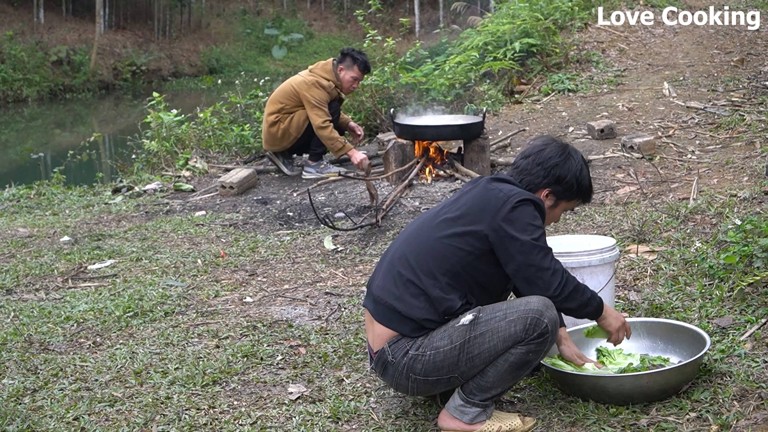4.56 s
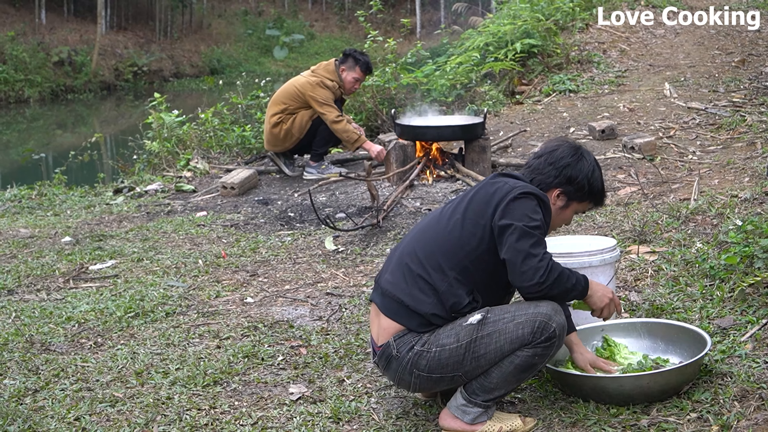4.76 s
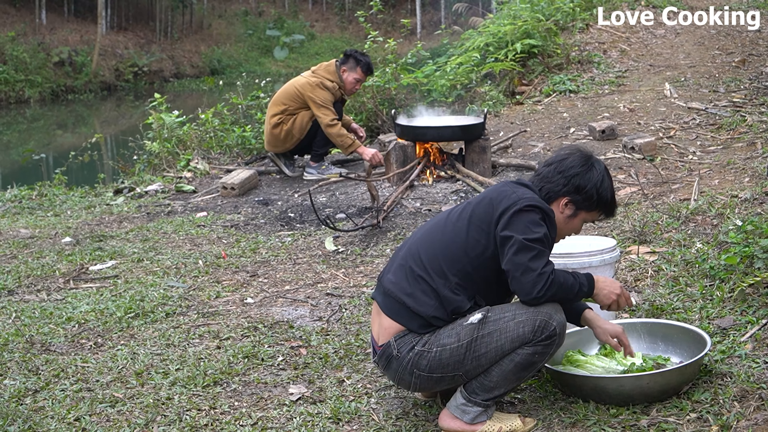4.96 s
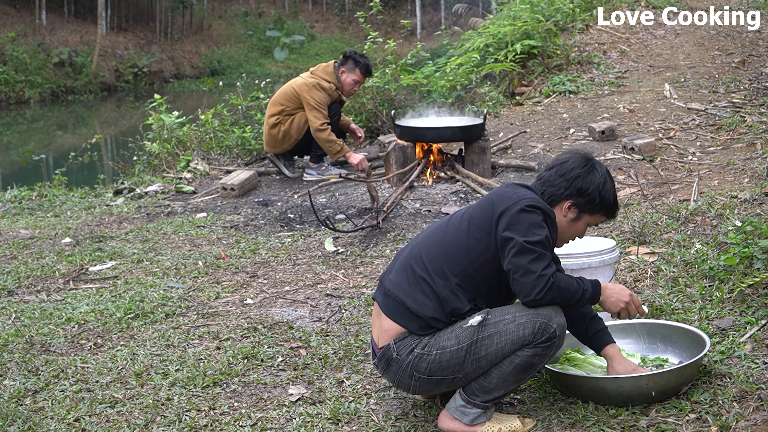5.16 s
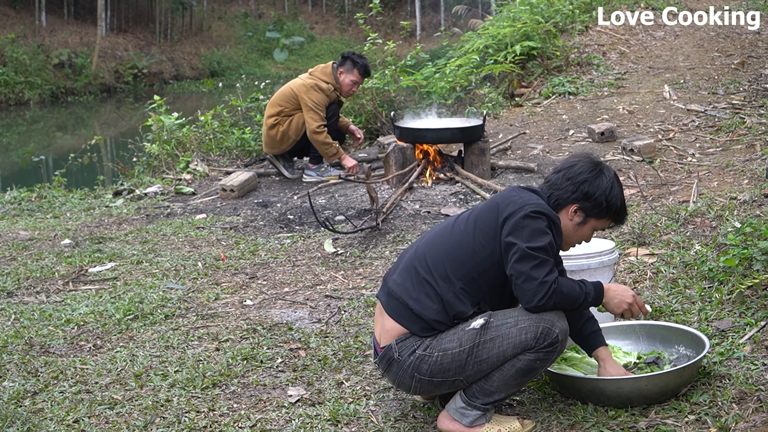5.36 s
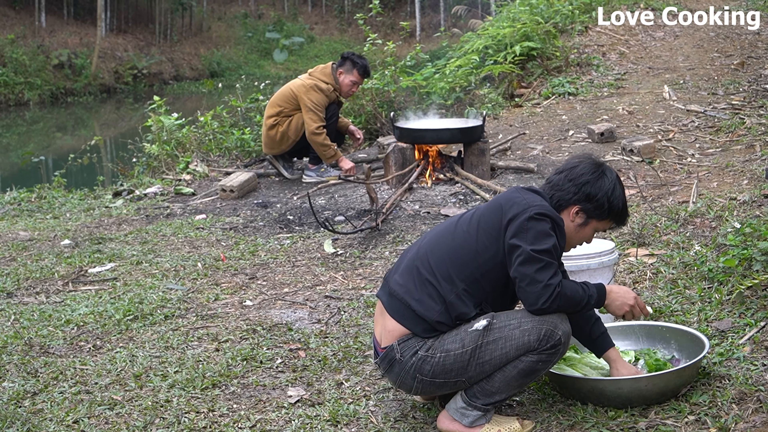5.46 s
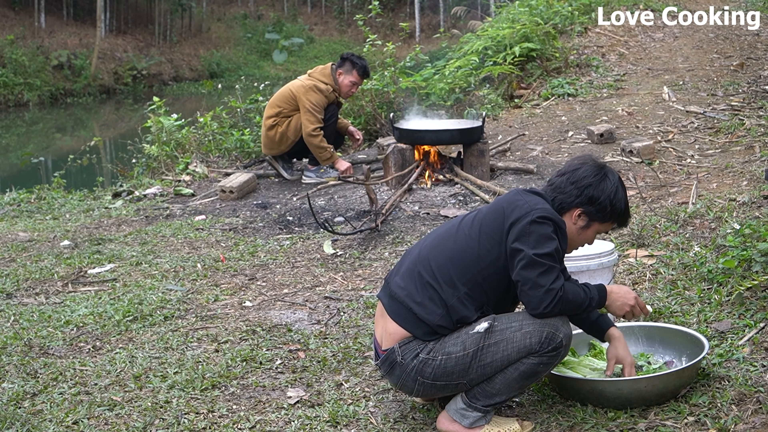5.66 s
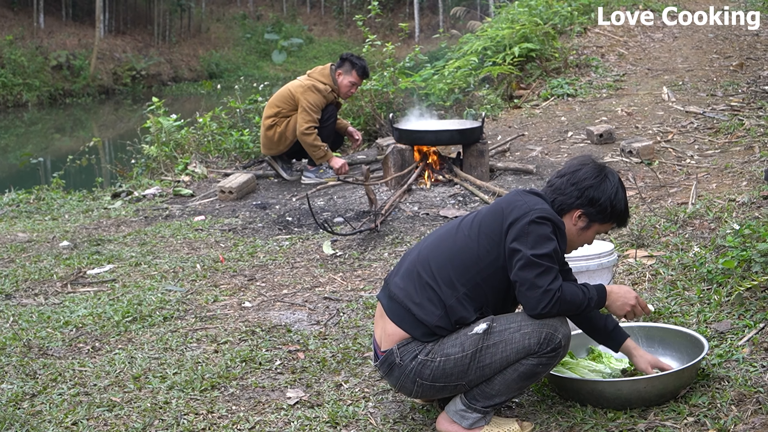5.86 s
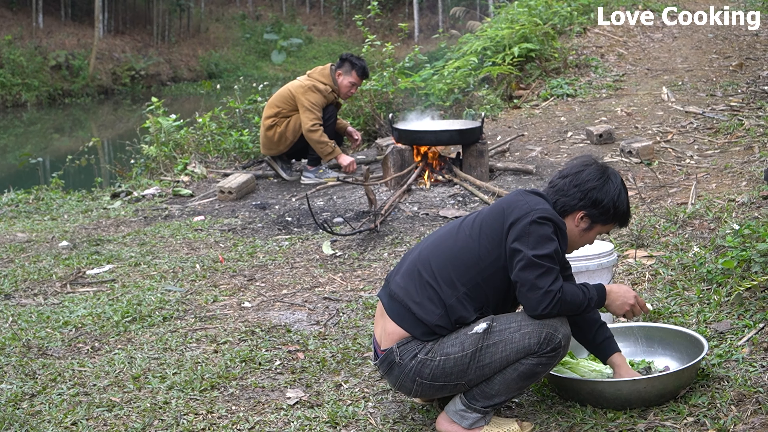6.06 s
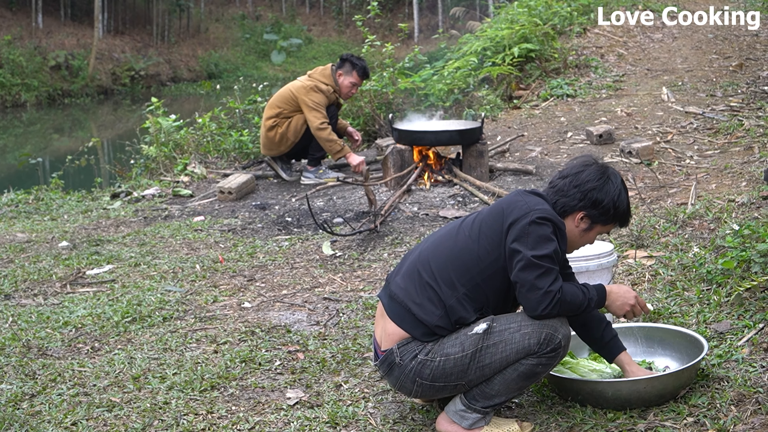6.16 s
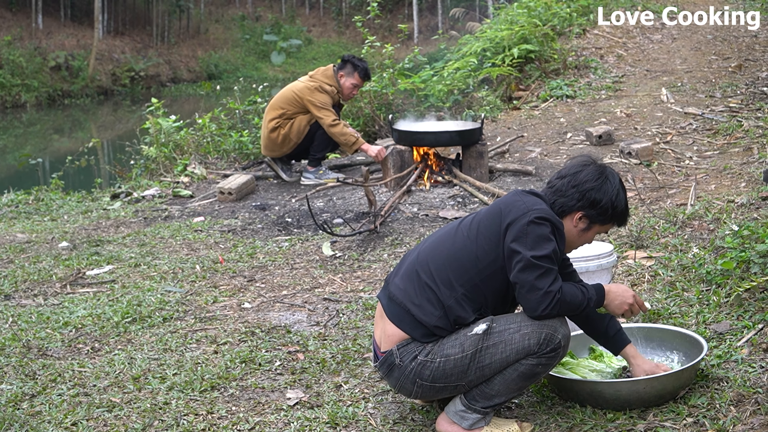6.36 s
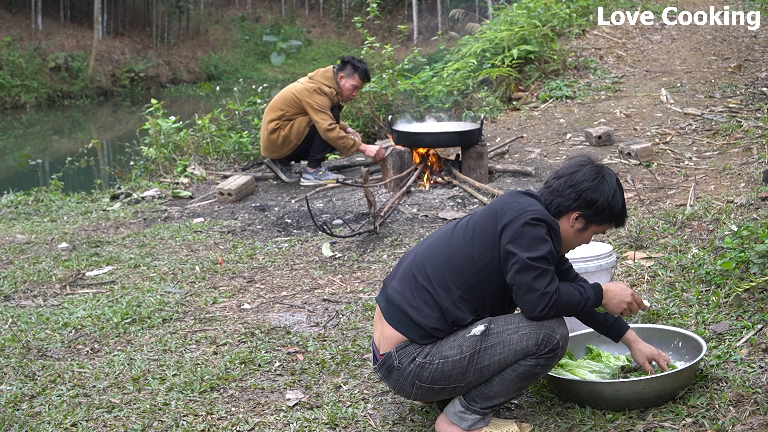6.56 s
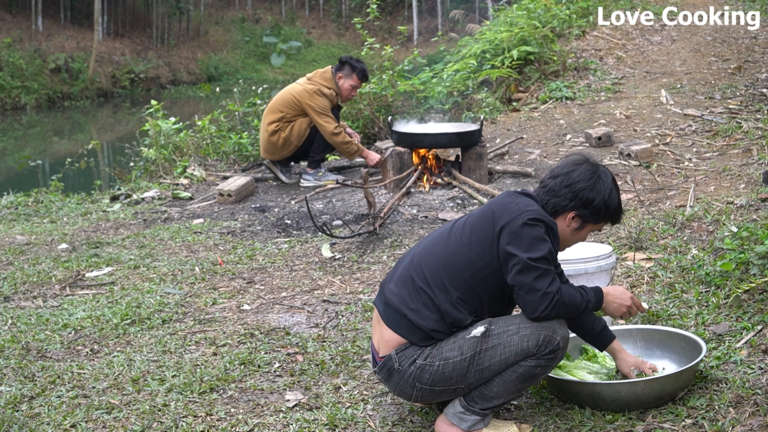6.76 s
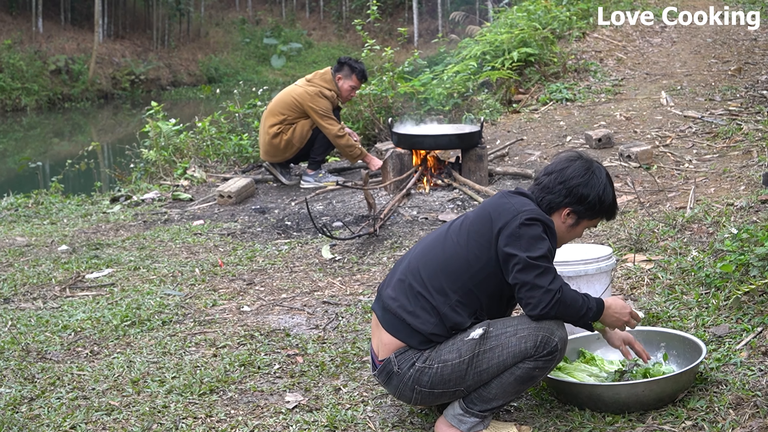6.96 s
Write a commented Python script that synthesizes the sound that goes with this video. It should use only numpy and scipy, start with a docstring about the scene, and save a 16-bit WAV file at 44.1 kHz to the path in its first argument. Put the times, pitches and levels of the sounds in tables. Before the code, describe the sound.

Outdoors, very close to a wide steel basin, a hand sloshes wet leafy greens while a crisp stalk cracks in sharp clusters and rubs squeakily. After about a second and a half it calms to small leaf clicks and drips, with a faint bird whistling far away. Then the washing is heard from a little farther off, with light swishes and falling drops over quiet air.

```python
"""Outdoors, close to a wide steel basin, a hand washes greens: bubbles make the slosh and spray, noise ticks
the leaves. In the first seconds a crisp stalk breaks in snaps, volleys of tiny impacts, and wet skin rubs in
stick-slip pulses. Then a small bird whistles now and then in the distance, in falling, trilled sine tones.
Later the washing sounds more distant, and scooped water falls back in short patters. Throughout, filtered noise
gives quiet air and a low rumble."""
import sys
import numpy as np
from scipy import signal
from scipy.fft import rfft, irfft, next_fast_len
from scipy.io import wavfile
from scipy.ndimage import uniform_filter1d, map_coordinates

SR = 44100
rng = np.random.default_rng(int(sys.argv[2]) if len(sys.argv) > 2 else 0)


def master_out(mix):
    """Clip the mix to full scale and print it as 16-bit PCM to the path in sys.argv[1]."""
    frames = np.transpose(np.atleast_2d(mix))
    ceiling = np.clip(frames, -1, 1)
    pcm = np.round(ceiling * 32767).astype(np.int16)
    wavfile.write(sys.argv[1], SR, pcm)


N = 308700
TIME = np.arange(N) / SR

# colours of big bubbles, small bubbles and leaves: (frequency [Hz], filter gain [dB])
SLOSH_COLOUR = [(90, -51), (200, -14.5), (330, -10), (480, -13.5), (650, -8.5), (830, -0.5), (1100, 0),
                (1400, -8.5), (2200, -43)]
SPRAY_COLOUR = [(700, -25), (1050, -3.5), (1300, -7), (1850, 1.5), (2400, 1), (3200, 2.5), (4200, -3),
                (5700, -4), (6700, -12), (8500, -13.5), (14000, -51.5)]
LEAF_COLOUR = [(3500, -35), (5500, 2.5), (6800, 0.5), (8500, -4), (11000, -8), (15500, -15)]
DISTANT_S = 4.4  # from here on the basin sounds more distant


def washing():
    """Stirred water traps big bubbles, its spray bursts into small ones, and wet leaves tick against each other."""
    slosh_gain, spray_gain, leaf_gain = stirring()
    # closeness falls from 1 to 0 in the half second before the basin turns distant
    near = np.clip(2 * (DISTANT_S - TIME), 0, 1)

    # the same contacts sound in every layer; harder stirring blurs them into a rush
    contact = ticks(rate=320, spread_db=5.0, decay=0.0024)
    slosh_db = 20 * np.log10(slosh_gain + 1e-9)
    churn = amp(np.clip(0.25 * (slosh_db + 55), -14, 4)) * rng.standard_normal(N)
    stirred = contact + churn

    big = bubbles(rate=300, lo_hz=373.3, hi_hz=1484, cycles=4.5, rise=0.076, spread_db=5.0, size=2400)
    small = bubbles(rate=700, lo_hz=1153.6, hi_hz=6274, cycles=8, rise=0.0525, spread_db=3.0, size=1100)
    # at first a mat of leaves covers the water and the bubbles are weaker in the mix
    free_water = amp(2 - 6 * near)
    slosh = free_water * coloured(big, SLOSH_COLOUR) + amp(-0.5) * coloured(stirred, SLOSH_COLOUR)
    spray = free_water * coloured(small, SPRAY_COLOUR) + amp(-1.0) * coloured(stirred, SPRAY_COLOUR)
    slosh, spray = [evened(unit(x + near * (hollow(x) - x)), span=0.051) for x in (slosh, spray)]

    leaf_ticks = contact + amp(-5) * ticks(rate=70, spread_db=2, decay=0.00084)
    crackle = evened(coloured(leaf_ticks, LEAF_COLOUR), span=0.06)
    return amp(-1.5) * slosh_gain * slosh + spray_gain * spray + leaf_gain * crackle


# strokes of the hand through the water, levels before the mix: (time at full speed [s], length [s],
# spray level [dB], slosh level over the spray [dB], leaf crackle level over the spray [dB])
STROKES = [(0.045, 0.14, -54, -2.5, -18), (0.117, 0.2, -58, 2.5, -10), (0.385, .14, -52, 1.5, -9),
           (0.56, 0.15, -57.5, -1, -11.5), (0.713, .04, -55.5, 2.5, -11), (0.766, 0.041, -49.5, -4, -7),
           (0.905, 0.21, -51.5, 0, -2.5), (1.156, 0.11, -63, 6.5, -6), (1.268, 0.044, -52.5, -1, -4.5),
           (1.346, .12, -60.5, 3, -23), (1.47, 0.086, -68, -2, -4), (1.759, 0.018, -64.5, -8, -12),
           (1.884, 0.22, -71, -8, 0), (2.122, 0.22, -60, -7.5, -7.5), (2.486, 0.42, -70, -6.5, -9),
           (2.772, 0.028, -66.5, 0, -5), (2.872, 0.01, -65, -7, 0), (2.998, 0.048, -65.5, -6, -11),
           (3.466, 0.099, -64.5, -5.5, -6), (3.768, 0.034, -49, -9, -5), (3.974, .02, -62.5, -3, -3.5),
           (4.436, 0.17, -58, -5, -12), (4.68, 0.077, -56.5, -5.5, -17.5), (4.808, 0.19, -64, -5, -13),
           (5.198, 0.083, -59.5, -8, -12.5), (5.344, 0.35, -61, -5.5, -14), (5.765, 0.059, -66, -11, -9),
           (6.016, 0.14, -54, -4.5, -19), (6.192, 0.078, -56.5, -2.5, -19), (6.3, .18, -52, -2.5, -17.5),
           (6.57, 0.019, -52, -0.5, -18), (6.66, 0.091, -56.5, -2, -10), (6.8, 0.053, -54, -1.5, -14.5),
           (6.917, 0.056, -57, -19, -11)]
LAPPING_DB = -74  # spray level at which the water still drips and laps between strokes, before the flicker
SETTLE_DB_PER_S, LEAF_SETTLE_DB_PER_S = 236, 334


def stirring():
    """Gains of slosh, spray and leaf crackle; the strongest stroke of the moment rules each."""
    slosh, spray, crackle = np.zeros(N), np.full(N, amp(LAPPING_DB)), np.zeros(N)
    for start, length, db, slosh_db, leaf_db in STROKES:
        water = amp(db) * stroke(start, length, SETTLE_DB_PER_S)
        leaves = amp(db + leaf_db) * stroke(start, length, LEAF_SETTLE_DB_PER_S)
        spray = np.maximum(spray, water)
        slosh = np.maximum(slosh, amp(slosh_db) * water)
        crackle = np.maximum(crackle, leaves)
    flicker = amp(0.77 * wobble(28))
    return np.array([slosh, spray, crackle]) * flicker


# a stroke of the usual length gathers speed at this pace, a shorter one more abruptly (by the power JERK)
RISE_DB_PER_S, USUAL_STROKE_S, JERK = 380, 0.083, 0.6
SAG_DB = 0.5  # the middle of a stroke is this much softer than its ends


def stroke(start, length, settle_db_per_s):
    """One push of the hand: it gathers speed, holds nearly level for its length and dies away."""
    age, length = TIME - start, max(length, .01)
    rise_db = RISE_DB_PER_S * (USUAL_STROKE_S / length) ** JERK * np.clip(age, -1, 0)
    sag_db = SAG_DB * (np.sin(np.pi * np.clip(age / length, 0, 1)) - .5)
    settle_db = settle_db_per_s * np.clip(age - length, 0, 1)
    return amp(rise_db - sag_db - settle_db)


# the basin's hollow from close by: (resonance frequency [Hz], width [Hz], level added to the direct sound [dB])
BASIN = [(890, 190, -6), (1480, 200, -8.5), (1800, 270, -4), (3550, 460, -16), (5900, 5400, -7.5)]


def hollow(x):
    """Close to the basin its few broad resonances stand out."""
    return x + sum(amp(db) * ring(x, hz, hz / width) for hz, width, db in BASIN)


def bubbles(rate, lo_hz, hi_hz, cycles, rise, spread_db, size):
    """A cloud of bubbles: damped sines whose pitch climbs as they near the surface."""
    when, pitch, life, strength = rng.random((int(rate * N / SR), 4)).T[:, :, None]
    hz = lo_hz * (hi_hz / lo_hz) ** pitch
    t = np.arange(size) / SR
    age = t * hz / (cycles * (.5 + life))
    phase = 2 * np.pi * hz * t * (1 + rise * np.minimum(age, 4) / 2)
    gain = amp(-spread_db * np.log(0.025 + strength))
    waves = gain * np.sin(phase) * np.exp(-age) * (1 - np.exp(-t * hz))
    places = (when * N).astype(int) + np.arange(size)
    return np.bincount(places.ravel(), waves.ravel(), N)[:N]


def ticks(rate, spread_db, decay):
    """Tiny cracks at random times, each a puff of noise that decays exponentially."""
    when, strength = rng.random((int(rate * N / SR), 2)).T
    tick_power = amp(-abs(spread_db) * np.log(0.005 + strength)) ** 2
    power = np.bincount((when * N).astype(int), tick_power, N)
    envelope = np.sqrt(signal.lfilter([1], [1, -np.exp(-2 / (decay * SR))], power))
    return unit(envelope * rng.standard_normal(N))


# stalks breaking, a thick one dull, a thin one crisp, levels before the mix:
# (time [s], decay scale [s], level [dB], tilt to the bass [dB], ring frequency [Hz])
SNAPS = [(0.095, 0.0085, -51, -0.5, 3160), (0.402, 0.0032, -52, 5.5, 1100), (0.464, 0.0024, -43.5, 5, 860),
         (0.477, 0.0022, -47.5, 4.5, 950), (0.745, 0.002, -40.5, 1.5, 3500),
         (0.7783, 0.0028, -36.5, 1, 5870), (0.784, 0.005, -48, 14, 900), (0.8046, 0.0015, -45, -3, 3180),
         (0.811, 0.0013, -40, -9, 5940), (0.9262, 0.0028, -39, 1, 2470), (0.98, 0.0026, -28, 2.5, 1720),
         (0.988, 0.0023, -40.5, -2, 790), (1.005, 0.0032, -43.5, 2, 5630), (1.068, 0.0033, -37, 0, 1860),
         (1.072, 0.0028, -36.5, 0.5, 1830), (1.091, 0.0012, -40, 4, 1650), (1.093, .0016, -41, -9.5, 5200),
         (1.2428, .0034, -47.5, 0, 960), (1.276, 0.0053, -47.5, 9.5, 980),
         (1.76, 0.0039, -53.5, -1.5, 2430), (2.142, 0.0038, -58, -2.5, 1530), (2.219, .003, -63, -4, 3420),
         (2.734, .003, -51.5, -4, 810), (2.763, .0028, -55.5, 0, 4750), (3.7338, .0028, -53.5, -3, 3800),
         (3.806, 0.0031, -53, 8, 810), (3.82, .0044, -46.5, -4.5, 2120)]


def snaps():
    """Fibres of a stalk give way in clusters."""
    track = np.zeros(N)
    for s, length, db, tilt_db, hz in SNAPS:
        snap = fracture(length, db, tilt_db, hz, spiky_db=2.0, ring_db=14.0, q=5.1,
                        break_db=6.5, low_hz=171, top_hz=14700)
        add(track, s, snap)
    return track


# thin leaf ribs clicking, levels before the mix: (time [s], level [dB])
CLICKS = [(0.0798, -53), (0.587, -66), (0.974, -58), (1.1245, -62), (1.801, -73), (1.96, -66.5),
          (1.966, -69.5), (2.085, -64), (2.231, -63.5), (2.383, -68), (2.416, -70), (2.495, -69),
          (2.534, -71.5), (2.784, -67.5), (2.877, -72), (3.085, -69.5), (3.223, -73), (3.334, -79),
          (3.529, -65.5), (3.6009, -51.5), (5.947, -75), (6.339, -60.5)]
CLICK_S, CLICK_TILT_DB, CLICK_HZ = 0.00175, -11, 6340  # shared by all clicks: decay scale, bass tilt and ring


def clicks():
    """A thin leaf rib gives way all at once, with one short, bright click."""
    track = np.zeros(N)
    for s, db in CLICKS:
        click = fracture(CLICK_S, db, CLICK_TILT_DB, CLICK_HZ, spiky_db=0.0, ring_db=5, q=4,
                         break_db=14.5, low_hz=302, top_hz=16500)
        add(track, s, click)
    return track


# colours of the low, middle and high parts of a crack: (frequency [Hz], filter gain [dB])
BODY_COLOUR = [(110, -31.5), (260, -13), (450, -3.5), (830, -1.5), (1100, -6.5), (1600, -29.5)]
CRACK_COLOUR = [(800, -34.5), (1300, 0), (1850, 4.5), (2050, 1.5), (2600, 1), (3400, 1), (4800, -37.5)]
CRISP_COLOUR = [(2900, -19), (4200, -2.5), (5700, 0), (7500, -8), (11000, -12.5), (15500, -16)]
BODY_DB, CRISP_DB = -6, -4  # an untilted crack's low and high parts, against its middle


def fracture(length, db, tilt_db, hz, spiky_db, ring_db, q, break_db, low_hz, top_hz):
    """A volley of tiny impacts with one sharp break early in it; treble dies first and a pocket of air rings along."""
    t = np.arange(SR // 16) / SR
    age = t / max(length, 1 / SR)
    spikes_db = spiky_db * np.repeat(rng.standard_normal(len(t)), 8)[:len(t)]
    volley = rng.standard_normal(len(t)) * amp(spikes_db)
    ringing = amp(ring_db) / (1 + (hz / 3500) ** 2)  # tiny pockets hardly ring
    sound = np.zeros(len(t))
    # each part: level [dB], colour, upper edge [Hz], speed of its decay
    parts = [(BODY_DB + tilt_db, BODY_COLOUR, 2500, 1),
             (0, CRACK_COLOUR, 6000, 1.05),
             (CRISP_DB - tilt_db, CRISP_COLOUR, top_hz, 1.25)]
    for part_db, colour, edge_hz, speed in parts:
        push = volley * np.sqrt(age) * np.exp(-age * speed)
        push[np.searchsorted(age, .4)] += amp(break_db)
        push = push + ringing * ring(push, hz, q)
        sound += amp(db + part_db) * burst(band(tinted(push, colour), low_hz, edge_hz))
    return sound


# wet stalks rubbing under the fingers: (time [s], length [s], first slip rate [Hz], last slip rate [Hz],
# level [dB], low-pass corner [Hz])
RUBS = [(1.1612, 0.0093, 700, 634, -35, 1960), (1.353, 0.026, 721, 615, -42, 493),
        (1.44, 0.013, 979, 830, -43.5, 1190)]


def rubs():
    """Wet skin sticks and slips on a stalk; each slip knocks the stalk's low resonance."""
    track = np.zeros(N)
    for s, length, first_hz, last_hz, db, bright_hz in RUBS:
        count = int(length * SR)
        turns = np.cumsum(np.linspace(first_hz, last_hz, count)) / SR + .5
        slips = np.diff(np.floor(turns), prepend=0)  # one pulse at each whole turn
        slips = slips * signal.windows.tukey(count, .5) * amp(2 * rng.standard_normal(count))
        scrape = amp(-11) * signal.windows.hann(count) * rng.standard_normal(count)
        push = np.pad(slips + scrape, (0, SR // 40))
        push = dulled(push + amp(8.5) * ring(push, 860, 4), bright_hz)
        add(track, s, amp(db) * burst(band(push, 320, 5600)))
    return track


# water slapping back into the basin, levels before the mix:
# (time [s], decay scale [s], level [dB], ring frequency [Hz])
SPLASHES = [(4.465, .0063, -56.5, 1440), (4.563, 0.0054, -55, 2900), (4.726, 0.0045, -49.5, 4900),
            (4.753, 0.0015, -53.5, 1650), (6.068, 0.0024, -46, 2460), (6.1975, 0.00458, -47.5, 2300),
            (6.298, .012, -45.5, 3100), (6.357, 0.003, -46, 2950), (6.37, 0.0066, -45.5, 1100),
            (6.391, 0.0028, -49, 2500), (6.414, .011, -46, 3050), (6.53, 0.0079, -49.5, 4000),
            (6.58, 0.0037, -55.5, 2050), (6.714, .0045, -44.5, 4740)]


def splashes():
    """Scooped water falls back as a patter of drops, a volley of impacts with a strong ring."""
    track = np.zeros(N)
    for s, length, db, hz in SPLASHES:
        splash = fracture(length, db, tilt_db=-1.7, hz=hz, spiky_db=4.5, ring_db=24.5, q=7.9,
                          break_db=13.5, low_hz=426, top_hz=7600)
        add(track, s, splash)
    return track


# single bubbles: (time [s], pitch one swell time in [Hz], level of the note [dB], swell time [s])
PLOPS = [(.172, 930, -52, 0.0034), (0.271, 1140, -56, 0.0044), (.508, 840, -51.5, 0.006),
         (.524, 844, -53, 0.0051), (0.897, 1670, -38.5, 0.00081), (1.212, 834, -50.5, 0.0019),
         (1.362, 700, -52, 0.0046), (1.398, 760, -57, 0.0053), (1.441, 4800, -54, .0014),
         (2.734, 830, -49, 0.0019), (4.51, 4500, -57.5, 0.00097), (4.672, 834, -62, 0.0018),
         (4.781, 2350, -58, 0.0035), (5.423, 2730, -48.5, 0.00059), (5.471, 4100, -56.5, 0.0024),
         (5.783, 3050, -61, .0028), (6.108, 1186, -51, 0.0061), (6.119, 1010, -48, 0.0065),
         (6.545, 593, -53, 0.0077), (6.665, 1660, -55, .0037), (6.778, 1870, -54, 0.0028),
         (6.789, 1120, -48, 0.0027), (6.8222, 1000, -45, 0.0026), (6.943, 2110, -53, 0.0024),
         (6.98, 2200, -52, 0.0017)]


def plops():
    """A single bubble swells into its note and glides up a little."""
    track, t = np.zeros(N), np.arange(SR // 16) / SR
    for s, hz, db, swell in PLOPS:
        age = t / swell
        glide = 1 + 5 * np.minimum(t - swell, .02)
        note = age ** 2 * np.exp(-1.9 * age) * np.sin(2 * np.pi * hz * np.cumsum(glide) / SR)
        film = rng.standard_normal(len(t)) * age * np.exp(-1.3 * age)  # the film tearing
        add(track, s, amp(db) * burst(note))
        add(track, s, amp(db - 9) * burst(band(film, 640, 4100)))
    return track


# the distant bird's falling whistles, levels before the scatter is added:
# (time [s], length [s], start frequency [Hz], end frequency [Hz], level [dB], trill depth at the start [Hz])
WHISTLES = [(1.476, 0.17, 5410, 4420, -72.5, 171), (3.329, 0.23, 5820, 4560, -76, 418),
            (4.189, 0.053, 5540, 5280, -78, 80), (5.089, 0.16, 5730, 5000, -77, 280)]


def bird():
    """Thin whistles that sink and then drop, with a quick, uneven trill."""
    track = np.zeros(N)
    for s, length, start_hz, end_hz, db, trill_hz in WHISTLES:
        u = np.linspace(0, 1, int(length * SR))
        fall = (2 * u + u ** 8) / 3
        trill = np.sin(2 * np.pi * 66 * u * length + wobble(61.3)[:len(u)])
        hz = start_hz + (end_hz - start_hz) * fall + trill_hz * (1 - 0.13 * u) * trill
        flutter = amp(-2.5 * trill + 1.5 * wobble(118)[:len(u)])
        voice = np.sin(2 * np.pi * np.cumsum(hz) / SR) * flutter * signal.windows.tukey(len(u), .1)
        add(track, s, amp(db) * unit(voice))
    return track


def surroundings(x, t60):
    """Scatter from the basin wall, the body and the ground: a noise tail that falls 60 dB in t60 seconds."""
    t = np.arange(SR // 4) / SR
    tail = rng.standard_normal(len(t)) * amp(-60 * t / t60) * (1 - np.exp(-t / 0.00071))
    return signal.fftconvolve(x, tail / np.linalg.norm(tail))[:N]


# colours of the open air and of the rumble below it: (frequency [Hz], filter gain [dB])
AIR_COLOUR = [(55, 2.5), (100, 2), (200, 2), (480, 0), (800, 2), (1200, -5.5), (2500, -12), (5000, -10),
              (8000, -16.5), (15500, -18)]
RUMBLE_COLOUR = [(8, -12.5), (16, 5), (25, -5.5), (33, -9), (43, -9), (54, -29), (80, -27), (160, -59)]


def air():
    """Still outdoor air with a slowly heaving rumble below it, both filtered noise."""
    hiss = amp(-70.0 + 0.56 * wobble(1.363)) * coloured(rng.standard_normal(N), AIR_COLOUR)
    rumble = amp(-63.0 + 0.53 * wobble(4.9)) * coloured(rng.standard_normal(N), RUMBLE_COLOUR)
    return hiss + rumble


def side_hiss():
    """Faint coloured noise, the only sound that differs between the two channels."""
    colour = [(30, 13), (120, 9.5), (400, 9), (1500, -13.5), (5000, -8.0), (15000, 5.0)]
    return amp(-79.5) * coloured(rng.standard_normal(N), colour)


def amp(db):
    """Decibels to gain."""
    return 10 ** (np.asarray(db) / 20)


def unit(x):
    """x at rms 1."""
    return x / np.sqrt(np.mean(x ** 2) + 1e-20)


def burst(x):
    """x with the energy of 10 ms at rms 1."""
    return x / np.sqrt(np.sum(x ** 2) / (SR / 100) + 1e-20)


def add(track, s, x):
    """Mix x into the track at time s."""
    start = int(np.clip(round(s * SR), 0, N - 1))
    track[start:start + len(x)] += x[:N - start]


def wobble(rate):
    """A smooth random curve, rate knots a second."""
    return map_coordinates(rng.standard_normal(int(N * rate / SR) + 4), [TIME * rate])


def coloured(x, points):
    """Tinted x at rms 1."""
    return unit(tinted(x, points))


def tinted(x, points):
    """x through a causal (minimum-phase) filter with the given (frequency [Hz], gain [dB]) points."""
    m = 2 * next_fast_len(len(x) // 2 + 2048)
    hz, db = np.transpose(points)
    gain = amp(np.interp(np.log(np.fft.rfftfreq(m, 1 / SR) + 1), np.log(hz), db))
    # folding the cepstrum onto positive times makes the filter causal
    cepstrum = irfft(np.log(gain), m)
    cepstrum[1:m // 2] *= 2
    cepstrum[m // 2 + 1:] = 0
    return irfft(rfft(x, m) * np.exp(rfft(cepstrum)), m)[:len(x)]


def band(x, lo_hz, hi_hz):
    """Causal band-pass."""
    edges = [lo_hz, min(hi_hz, SR / 2 - 100)]
    return signal.sosfilt(signal.butter(3, edges, "band", fs=SR, output="sos"), x)


def dulled(x, hz):
    """A gentle low-pass."""
    return signal.lfilter([1], [1, -np.exp(-2 * np.pi * hz / SR)], x)


def ring(x, hz, q):
    """One damped resonance."""
    return signal.lfilter(*signal.iirpeak(min(hz, SR / 3), max(q, 1), fs=SR), x)


def evened(x, span):
    """x with its level held over about span seconds, finer grain kept."""
    width = int(span * SR) + 1
    power = uniform_filter1d(uniform_filter1d(x ** 2, width), width)
    return x / np.sqrt(np.abs(power) + 1e-4)


def scene():
    """Everything sits in the middle; only a faint hiss differs between the ears."""
    hits = amp(-0.4) * (snaps() + clicks()) + amp(-2.5) * splashes() + plops() + rubs()
    near_scatter = amp(-15.5) * surroundings(hits, t60=0.016)
    song = bird()
    far_scatter = amp(3) * surroundings(song, t60=0.051)  # far off, scatter outweighs the direct song
    centre = washing() + hits + near_scatter + song + far_scatter + air()
    side = side_hiss()
    return np.array([centre + side, centre - side])


TOP_HZ = 16000


def record(dry):
    """The microphone's channels keep nothing from the band limit upwards."""
    m = next_fast_len(N + SR // 2)
    passed = np.fft.rfftfreq(m, 1 / SR) < TOP_HZ
    return irfft(rfft(dry, m) * passed, m)[:, :N]


dry = scene()
out = record(dry)
master_out(out)
```